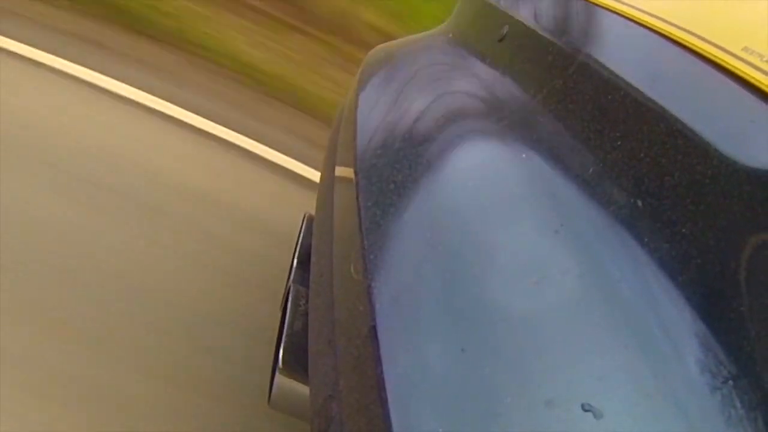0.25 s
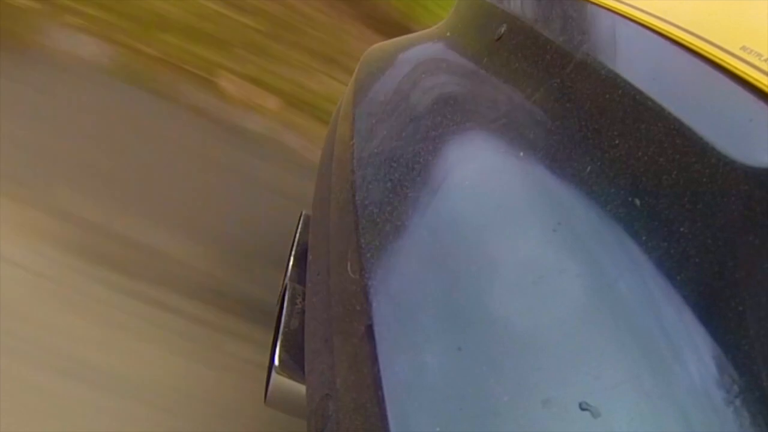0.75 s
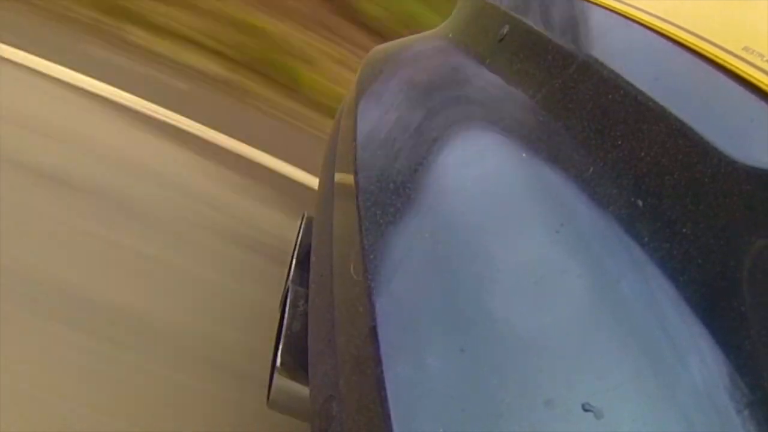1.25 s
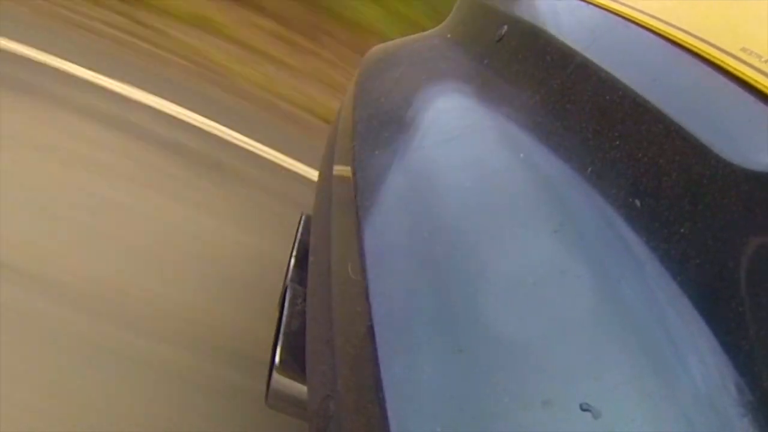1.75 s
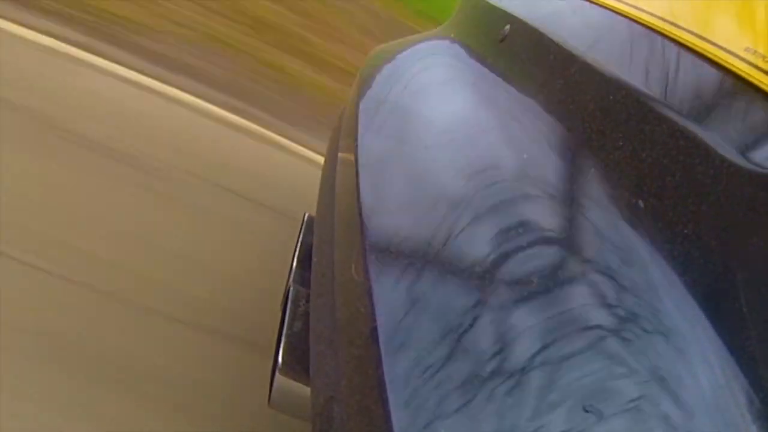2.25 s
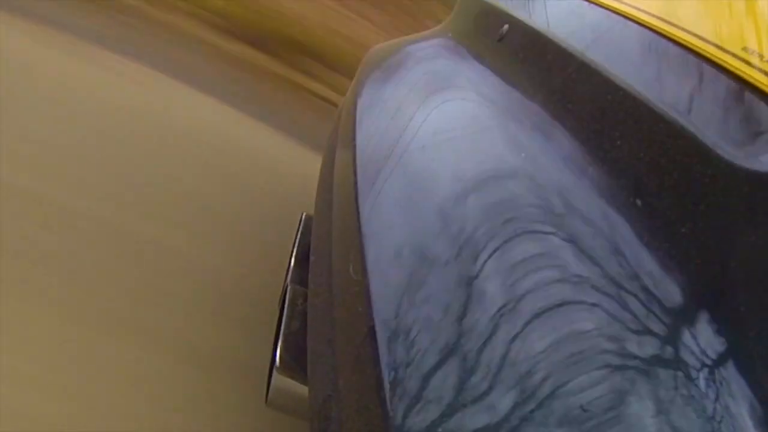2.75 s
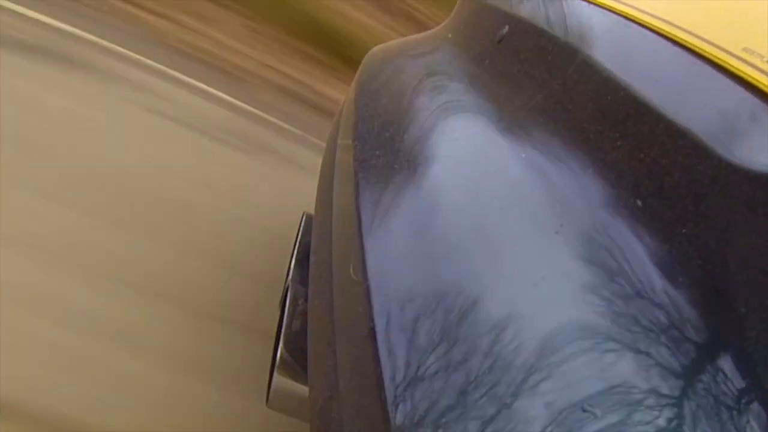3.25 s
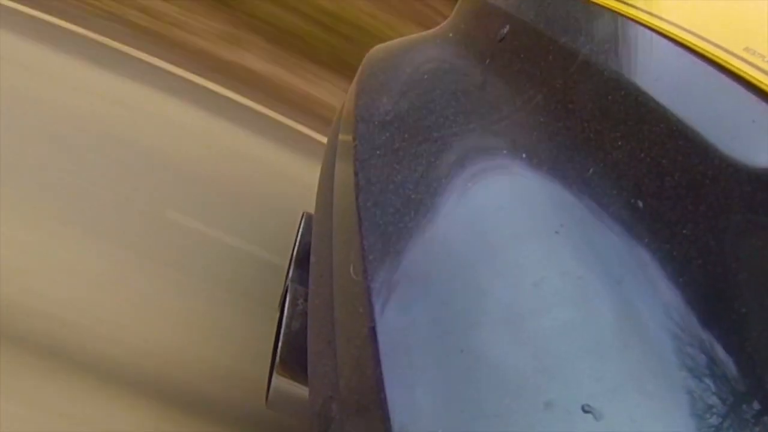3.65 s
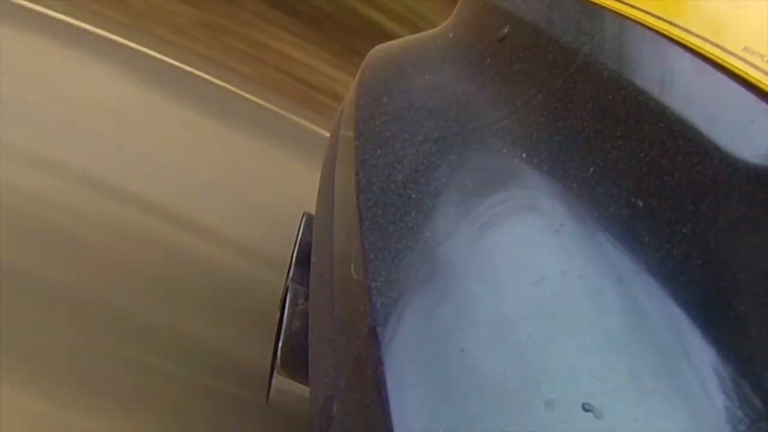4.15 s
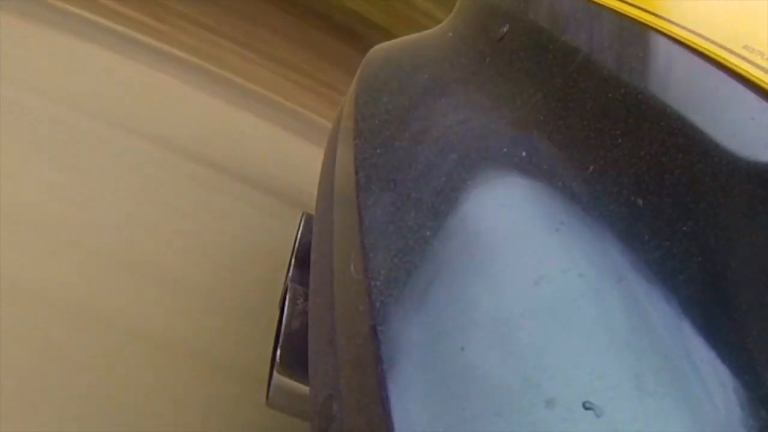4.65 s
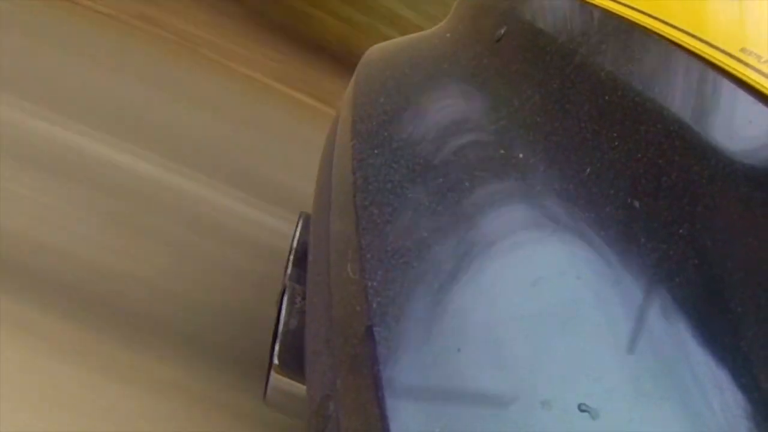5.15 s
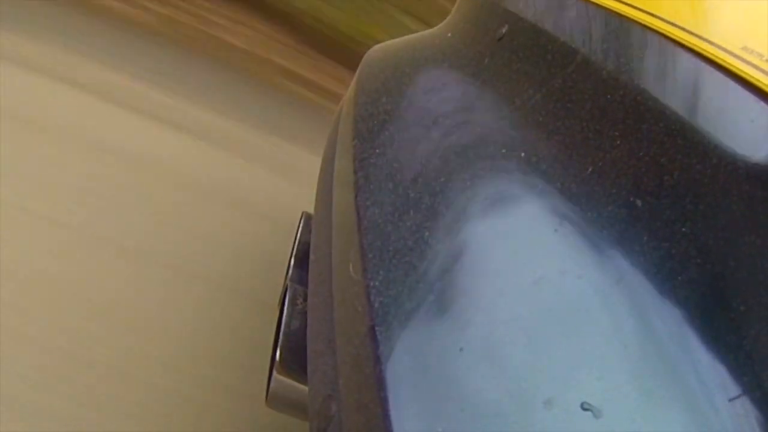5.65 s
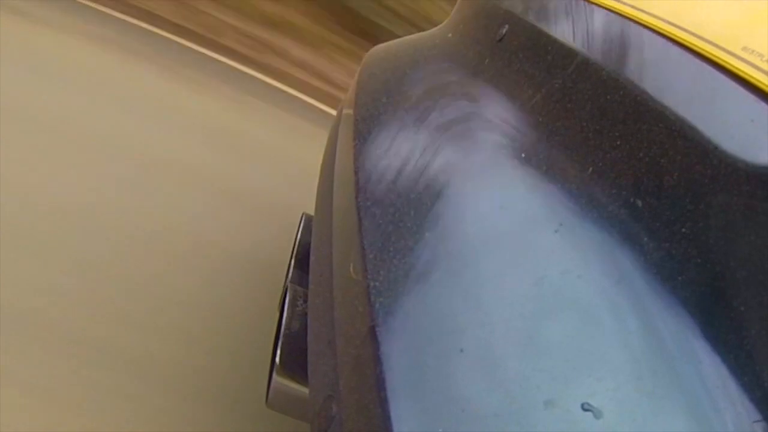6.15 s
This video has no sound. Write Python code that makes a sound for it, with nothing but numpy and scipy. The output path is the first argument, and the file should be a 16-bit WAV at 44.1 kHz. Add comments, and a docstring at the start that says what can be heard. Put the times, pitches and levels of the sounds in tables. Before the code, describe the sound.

Microphone on the rear bumper, outdoors at speed: a resonant exhaust hums, gulps and goes hollow as the driver lifts, then barks back and rises steadily with a metallic, buzzing edge. Near the top it hammers unevenly, then the throttle snaps shut and dozens of dry pops sputter for under a second before the engine settles to a quieter drone, over faint wind buffeting and road noise.

```python
"""Sports car from the rear bumper

Country road, microphone on the bumper beside the tailpipe of a six-cylinder sports car, very close.
The car cruises, lifts, pulls hard for four seconds, then lifts again and crackles on the overrun.
Engine: tones at multiples of the cycle (drone), filtered gas pulses (body, bark), shock clicks (rasp).
Crackle: decaying tones and noise bursts. Low boom, wake buffeting and tyre hiss: filtered noise."""
import sys
import numpy as np
from scipy import signal
from scipy.fft import rfft, irfft
from scipy.io import wavfile
from scipy.ndimage import uniform_filter1d

SR = 44100
rng = np.random.default_rng(int(sys.argv[2]) if len(sys.argv) > 2 else 0)


def unload_wav(signal):
    """Save mono or channel-first audio to the path in sys.argv[1] as 16-bit WAV at rate SR, clipped to [-1, 1]."""
    wavfile.write(
        sys.argv[1],
        SR,
        np.round(np.clip(np.atleast_2d(signal).T, -1, 1) * 32767).astype(np.int16),
    )


N = 282240
T = np.arange(N) / SR  # t/s of every sample

# engine speed: t/s, firing rate/Hz
FIRING_RATE = [(0, 200.72), (.76, 195.29), (1.1, 198.55), (1.2, 202.51), (1.35, 199.56), (1.5, 204.35),
               (1.7, 205.67), (2.08, 213.05), (2.28, 220.6), (2.41, 220.63), (2.9, 231.78), (3.36, 244.37),
               (4.14, 263.53), (4.53, 271.06), (4.82, 274.94), (5, 268.17), (5.28, 269.52), (6.4, 260.14)]
# engine load as the driver cruises, lifts, pulls, lifts and picks up again: t/s, level re full load/dB
LOAD_DB = [(0, -18), (.5, -22.5), (.62, -24), (1.03, -24), (1.11, -5), (1.75, -1.77), (2.4, 0.5), (3, 0.5),
           (3.5, -1), (4, 0.54), (4.7, -1), (4.86, -0.5), (4.97, -34), (5.11, -17), (5.65, -16),
           (5.95, -24), (6.2, -24.5), (6.4, -17.5)]
# how unevenly the engine burns, worst as the throttle shuts or opens: t/s, roughness/0-1
ROUGHNESS = [(0, .1), (.5, .1), (.57, .7), (.7, .5), (.95, .3), (1.1, .5), (1.4, .35), (1.7, .25),
             (2.3, .21), (4.85, .17), (5.1, 1), (5.85, 1), (6, .15)]
# the cylinders in firing order, the two banks taking turns:
# strength/dB, lateness/firing intervals, rasp/dB
CYLINDERS = [(12, 0.0081, -6), (8, 0.02, -4.5), (15, 0.008, -12.5), (7, 0.038, -20), (12, -0.028, -14.5),
             (3.5, 0.026, -31.5)]
# near the top of the revs one cylinder hammers above the rest, around this firing rate
HAMMER_HZ, HAMMER_HALF_WIDTH_HZ, HAMMER_FULL_LOAD_DB = 268.5, 6, 11
HAMMER_RASP = .4  # share of those dB that also sharpens its rasp
PULL_RANGE_DB = 11  # shocks and hammering are gone this far below full load

# stretches with the throttle shut: start t/s, end t/s, change of drone/dB, change of body/dB
LIFTS = [(0.561, 1.022, -10, -7.5), (4.928, 5.055, -10, -7), (5.1, 5.9, -4.5, -1)]
SHUT_S, REOPEN_S = 0.048, 0.055  # lengths of the ramps into and out of a lift
# the exhaust gulps as the throttle snaps shut or open: t/s, strength/0-1
GULPS = [(.64, 1), (1.07, .6)]
GULP_S, GULP_BODY_DB = 0.079, 4.5  # time from the peak to 1/e, rise of the body in a full gulp

# clean tones of the exhaust drone: multiple of the engine cycle
DRONE_ORDERS = (4, 6, 9, 12, 15, 18, 21)
# one row for each drone order: level/dB, gain per dB of load/dB, gain in a full gulp/dB
DRONE_DRIVE = [(-2.5, -0.1, -3.5), (-0.5, 0.0646, -0.5), (-12.5, 0.27, 14.5), (0, 0.23, -1.5),
               (-7.5, 0.4, 6.5), (2.5, 0.74, 7), (-9, 0.5, 5.5)]
# standing waves of the whole exhaust, swept by each order as the revs climb: f/Hz, level/dB
STANDING_WAVES = [(168, -47.5), (182, -27.5), (199, -7), (210, -20.5), (220, -14.5), (227, -24),
                  (240, -36.5), (252, -25), (275, -24), (300, -15.5), (350, -32), (400, -22), (480, -27.5),
                  (530, -22), (615, -27), (662, -17.5), (725, -18.5), (765, -26.5), (795, -19.5),
                  (820, -25), (875, -13.5), (960, -23)]
# colour of the pipe: f/Hz, level/dB
PIPE_COLOUR = [(160, -35.5), (250, -14.5), (400, -7.5), (560, -7), (690, 5.5), (790, -7.5), (900, -7),
               (1020, -12.5), (1170, -17.5), (1290, -8.5), (1345, 1), (1385, 6), (1450, 4.5), (1540, -2),
               (1680, -9), (1880, -22), (1990, -14), (2090, -22.5), (2220, -8), (2450, -24.5),
               (2750, -25.5), (3100, -60.5)]
# colour of the shock fronts at the pipe mouth: f/Hz, level/dB
MOUTH_COLOUR = [(1400, -16.5), (2000, -13.5), (2250, -8.5), (2550, -10), (2850, -9.5), (3200, 2),
                (3850, -10), (4300, -18), (5000, -13.5), (5500, -25), (6250, -17.5), (7100, -29),
                (7800, -19.5), (9600, -32.5), (11300, -35.5), (12200, -28.5), (13200, -35), (15500, -45)]
# revs at which a loaded engine's pulses steepen into shocks: firing rate/Hz, extra rasp/dB
SHOCKS = [(211, -0.5), (220, 7), (236, 3), (243, 10), (265, 8.5), (273, 5.5)]

# unburnt fuel going off in the pipe: t/s, relative level/dB, relative sharpness of the crack/dB
POPS = [(5.052, -25, -27), (5.1102, -22, -29), (5.1369, -8.5, -14.5), (5.1418, -20.5, -12),
        (5.185, -22.5, -21), (5.225, -9, -11.5), (5.2644, -5.5, -10.5), (5.3115, -22.5, -19),
        (5.3349, -17, -12.5), (5.3542, -7, -13.5), (5.4006, -23, -17), (5.4265, -8.5, -27),
        (5.4316, -16.5, -11.5), (5.4431, -10, -14.5), (5.4892, -26, -14), (5.5171, -7, -14.5),
        (5.5324, -20, -5.5), (5.5904, -11, -11), (5.6079, -7.5, -12), (5.68, -9.5, -13), (5.6944, -16, -16),
        (5.7203, -11, -13.5), (5.7354, -13, -12), (5.7926, -9.5, -13), (5.8412, -8, -8.5),
        (5.8965, -26.5, -15)]
# what a pop rings in the tailpipe: f/Hz, relative level/dB, t60/s
TAILPIPE_MODES = [(271, -16, 0.032), (522, -17, 0.02), (705, -3.5, 0.019), (930, -12.5, 0.034),
                  (1417, -3.5, 0.038), (1448, -6, 0.045), (2050, -13.5, 0.014)]

# buffeting of the wake: t/s, relative level/dB
WIND_DB = [(0, -18), (.8, -20), (1.6, -23.5), (2.4, -25.5), (3.8, -28.5), (5, -27), (5.7, -29.5),
           (6.4, -26.5)]
# slow throb of the eddies, relative spectrum: f/Hz, level/dB
THROB_SPECTRUM = [(10, -24), (17, -9), (21, 0), (25, -9), (35, -16), (50, -35)]
# rumble above the throb, relative spectrum: f/Hz, level/dB
RUMBLE_SPECTRUM = [(22, 4), (45, 0.5), (70, -11), (90, -1.5), (115, -11), (145, -22.5), (180, -6.5),
                   (260, -20), (500, -60.5)]
# tyres on asphalt, relative spectrum: f/Hz, level/dB
ROAD_SPECTRUM = [(250, -18.5), (450, -26), (720, -22), (1150, -5.5), (1420, -1.5), (1900, -11), (2700, -29),
                 (3300, -22), (4300, -35), (5000, -24.5), (5600, -41.5), (8000, -44), (10000, -50.5),
                 (15000, -68)]
EDGE_HZ = 15600  # upper limit of the audible band


def crank():
    """Engine cycles turned so far: the firing rate summed up and shared among the cylinders."""
    return np.cumsum(curve(FIRING_RATE)) / SR / len(CYLINDERS) - .03


def firings(cycles, drift_s=.00004, drift_db=.9):
    """Time, strength and rasp of every firing; slow drift per cylinder makes upper orders fade in and out."""
    count = len(CYLINDERS)
    n = np.arange(np.ceil(cycles[0] * count), cycles[-1] * count - 1).astype(int)
    cylinder, cycle = n % count, n // count
    strength_db, late, rasp_db = np.array(CYLINDERS)[cylinder].T

    walk = rng.standard_normal((2, cycle[-1] + 1, count))
    drift = evened(uniform_filter1d(walk, size=12, axis=1))  # smoothed over 12 cycles
    lag, swell = drift[:, cycle, cylinder]
    times = np.interp((n + late) / count, cycles, T) + drift_s * lag

    detuning = (curve(FIRING_RATE) - HAMMER_HZ) / HAMMER_HALF_WIDTH_HZ
    hammer_db = HAMMER_FULL_LOAD_DB * pulling() / (1 + detuning ** 2)
    extra_db = np.interp(times, T, hammer_db) * (cylinder == 0)
    return times, strength_db + drift_db * swell + extra_db, rasp_db + HAMMER_RASP * extra_db


def exhaust(cycles, times, strength_db, body_db=-27.0, coast_db_per_octave=-12, pull_db_per_octave=-19,
            bark_db=-17, turbulent=0.99):
    """Uneven gas pulses ring the pipe: a body that thins as revs climb, a hard bark that follows the load."""
    rough = curve(ROUGHNESS)
    uneven_db = 4 * np.interp(times, T, rough) * rng.standard_normal(len(times))
    sizes = amp(strength_db + uneven_db)
    turbulence = turbulent * rough * puffs(times, sizes, .003, rng.standard_normal(N))
    gas = colour(evened(clicks(times, sizes)) + turbulence, PIPE_COLOUR)

    # take out the orders that sound in the drone: shift each to 0 Hz, average, subtract
    for k in DRONE_ORDERS[1:]:
        turn = np.exp(2j * np.pi * k * cycles)
        order = uniform_filter1d(uniform_filter1d(gas / turn, size=3000), size=3000)
        gas = gas - 2 * (turn * order).real

    speed = curve(FIRING_RATE)
    slope = coast_db_per_octave + (pull_db_per_octave - coast_db_per_octave) * pulling()
    body_level = body_db + slope * np.log2(speed / speed[0]) + lifted()[1] + GULP_BODY_DB * gulping()
    body = amp(body_level) * steady(band(gas, 240, 952))
    bark = amp(bark_db + curve(LOAD_DB)) * steady(band(gas, 903, 3130))
    return body + bark


def drone(cycles, waver=.8):
    """Clean low orders swell and fade past the exhaust's resonances, and gurgle when burning is rough."""
    depth = waver * curve(ROUGHNESS)
    cycle_hz = curve(FIRING_RATE) / len(CYLINDERS)
    load, lift_db, gulp = curve(LOAD_DB), lifted()[0], gulping()
    knots = np.linspace(0, T[-1], num=300)  # times of the random waver
    out = np.zeros(N)
    for k, (order_db, per_load, gulp_db) in zip(DRONE_ORDERS, DRONE_DRIVE):
        resonance_db = np.interp(k * cycle_hz, *np.transpose(STANDING_WAVES))
        db = order_db + resonance_db + per_load * load + lift_db + gulp_db * gulp
        swell = np.interp(T, knots, rng.standard_normal(len(knots)))
        slip = np.interp(T, knots, rng.standard_normal(len(knots)))
        tone = np.cos(2 * np.pi * k * cycles + depth * slip)
        out += amp(db) * (1 + .5 * depth * swell) * tone
    return out


def rasp(cycles, times, rasp_db, puff_s=0.0035, steepening=1.7, level_db=-34, per_load=1.1,
         fizz_db=-22.5, fizz_growth=1.01, gentle_contrast=0.52, contrast_growth=0.042):
    """Pulses steepen into shocks; under full load the strongest, once a cycle, spits the highest treble."""
    shock_db = np.interp(curve(FIRING_RATE), *np.transpose(SHOCKS))
    force = per_load * curve(LOAD_DB) + pulling() * shock_db
    # a gentle blast is more even from cylinder to cylinder
    contrast = np.clip(gentle_contrast + contrast_growth * np.interp(times, T, force), .2, 2)
    sizes = amp(contrast * rasp_db + 1.6 * rng.standard_normal(len(times)))

    # the ripples behind the shocks largely repeat from cycle to cycle
    pattern = rng.standard_normal(size=1000)
    repeating = evened(np.interp(cycles % 1, np.linspace(0, 1, len(pattern)), pattern))
    grain = .75 * repeating + .66 * rng.standard_normal(N)

    shocks = .5 * evened(clicks(times, sizes)) + puffs(times, sizes, puff_s, grain)
    spit = puffs(times, sizes ** steepening, .0022, grain)  # the power favours the strongest
    low = steady(band(colour(shocks, MOUTH_COLOUR), 2400, 6600))
    high = steady(band(colour(spit, MOUTH_COLOUR), 5500, 16000))
    return amp(force + level_db) * (low + high * amp(fizz_db + fizz_growth * force))


def crackle(ring_db=1, crack_db=7, swell_s=0.0028, echo_s=0.0081, echo_db=-17, rough=0.81,
            gust_s=0.0037, tail_db=-31, tail_s=0.041, sharpening=0.052):
    """A pop is a sharp crack, a short tailpipe ring and a silencer echo; bigger pops crack harder."""
    out, t = np.zeros(N), np.arange(SR // 10) / SR
    snap = np.exp(-t / .0014) + amp(tail_db) * np.exp(-t / tail_s)
    for s, db, sharp_db in POPS:
        grit, gust = rng.standard_normal((2, len(t)))
        detune = 1 + .015 * rng.standard_normal(len(TAILPIPE_MODES))  # each pop rings a little off
        tones = sum(amp(d - 60 * t / t60) * np.sin(2 * np.pi * hz * e * t)
                    for (hz, d, t60), e in zip(TAILPIPE_MODES, detune))
        breath = evened(colour(gust * np.exp(-t / gust_s), PIPE_COLOUR))
        ring = evened(tones * (1 - np.exp(-t / swell_s))) + rough * breath
        crack = colour(grit * snap, MOUTH_COLOUR)
        ring_part = amp(ring_db) * ring / abs(ring).max()
        crack_part = amp(crack_db + sharp_db + sharpening * db) * crack / abs(crack).max()
        pop = amp(db) * (ring_part + crack_part)
        add(out, s, pop)
        add(out, s + echo_s, amp(echo_db) * pop)
    return out


def surge(start=0.756, end=1.034, swell_s=.16, fade_s=0.051, level_db=-16, low_hz=38, high_hz=98):
    """The car booms briefly as it coasts: a swell of low-frequency noise."""
    boom = steady(band(rng.standard_normal(N), low_hz, high_hz, order=3))
    return amp(level_db) * span(start, end, swell_s, fade_s) * boom


def wind(throb_db=-1, rumble_db=-1.15):
    """Eddies shed by the car beat on the microphone: a slow throb under a rumble."""
    throb = amp(throb_db) * noise(THROB_SPECTRUM)
    rumble = amp(rumble_db) * steady(noise(RUMBLE_SPECTRUM), size=5000)
    return amp(curve(WIND_DB)) * (throb + rumble)


def road(level_db=-41):
    """Steady tyre roar, and a faint high whine of narrow noise that dies as the car starts to pull."""
    fade = np.interp(T, [1.05, 1.3], [1, 0])
    whine = amp(-82) * fade * steady(band(rng.standard_normal(N), 12900, 13000))
    return amp(level_db) * noise(ROAD_SPECTRUM) + whine


def pulling():
    """1 at full load, falling to 0 at PULL_RANGE_DB below it."""
    return np.clip(1 + curve(LOAD_DB) / PULL_RANGE_DB, 0, 1)


def lifted():
    """What the shut throttle does to the drone and to the body of the exhaust, in dB."""
    return sum(np.outer([drone_db, body_db], span(start, end, SHUT_S, REOPEN_S))
               for start, end, drone_db, body_db in LIFTS)


def gulping():
    """Brief swells of 0 to 1 around each snap of the throttle."""
    return sum(strength * np.exp(-((T - s) / GULP_S) ** 2) for s, strength in GULPS)


def span(start, end, rise_s, fall_s):
    """1 between start and end and 0 outside, with ramps centred on both."""
    return np.clip(.5 + np.minimum((T - start) / rise_s, (end - T) / fall_s), 0, 1)


def clicks(times, sizes):
    """Band-limited impulses at exact times, between samples if need be (windowed sinc)."""
    out = np.zeros(N)
    at = np.round(times * SR).astype(int)[:, None] + np.arange(-8, 9)
    off = at - times[:, None] * SR
    np.add.at(out, np.clip(at, 0, N - 1), sizes[:, None] * np.sinc(off) * np.sinc(off / 9))
    return out


def puffs(times, sizes, decay_s, grain):
    """An exponentially dying burst of the given turbulence after every impulse."""
    gate = signal.lfilter([1], [1, -np.exp(-1 / (decay_s * SR))], clicks(times, sizes))
    return evened(gate * grain)


def noise(points):
    """Noise of RMS 1 with the given spectrum and nothing outside it."""
    hz, db = np.transpose(points)
    log_hz = np.log(np.fft.rfftfreq(N, 1 / SR) + 1e-9)
    gain_db = np.interp(log_hz, np.log(hz), db, -np.inf, -np.inf)
    return evened(irfft(rfft(rng.standard_normal(N)) * amp(gain_db), N))


def colour(x, points, size=8192):
    """Causal minimum-phase filter with the given spectrum: its peaks ring after each pulse."""
    hz, db = np.transpose(points)
    log_hz = np.log(np.fft.rfftfreq(size, 1 / SR) + 1)
    cepstrum = irfft(np.log(amp(np.interp(log_hz, np.log(hz), db))))
    cepstrum[1:size // 2] *= 2  # fold the cepstrum onto positive time
    cepstrum[size // 2 + 1:] = 0
    return signal.oaconvolve(x, irfft(np.exp(rfft(cepstrum))))[:len(x)]


def band(x, lo_hz, hi_hz, order=4):
    """Butterworth band-pass."""
    return signal.sosfilt(signal.butter(order, [lo_hz, hi_hz], "band", fs=SR, output="sos"), x)


def steady(x, size=3000):
    """Scales a sound to a running level of 1."""
    power = uniform_filter1d(uniform_filter1d(x ** 2, size), size)
    return x / np.sqrt(abs(power) + 1e-14)


def evened(x):
    """Scales a sound to an overall RMS of 1."""
    return x / np.sqrt(np.mean(x ** 2) + 1e-20)


def amp(db):
    """Amplitude factor of a level in dB."""
    return 10 ** (np.asarray(db) / 20)


def curve(rows):
    """Second column of a table against its time column, sample by sample."""
    return np.interp(T, *np.transpose(rows))


def add(mix, s, sound):
    """Lays a sound into the mix at s seconds."""
    part = mix[round(s * SR):][:len(sound)]
    part += sound[:len(part)]


def scene():
    """Engine, crackle and boom close by, with wake and tyres behind them; one channel."""
    cycles = crank()
    times, strength_db, rasp_db = firings(cycles)
    engine = exhaust(cycles, times, strength_db) + drone(cycles) + rasp(cycles, times, rasp_db)
    return (engine + amp(4.5) * crackle() + surge() + wind() + road())[None]


def record(dry):
    """The loudest peaks are rounded off; then the band limit."""
    held = dry / (1 + (dry / .95) ** 8) ** (1 / 8)
    lowpass = signal.firwin(255, EDGE_HZ, window=("kaiser", 9), fs=SR)
    return signal.oaconvolve(held, lowpass[None], "same")


dry = scene()
out = record(dry)
unload_wav(out)
```